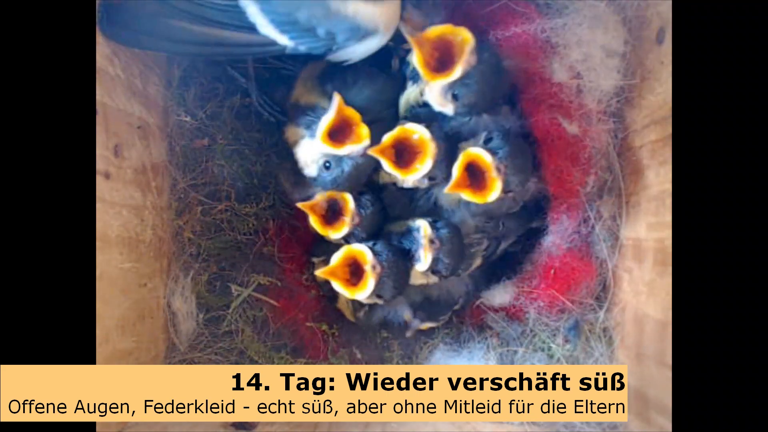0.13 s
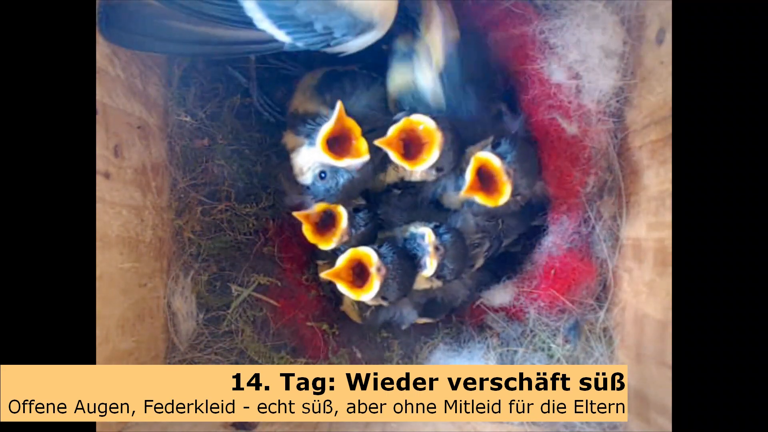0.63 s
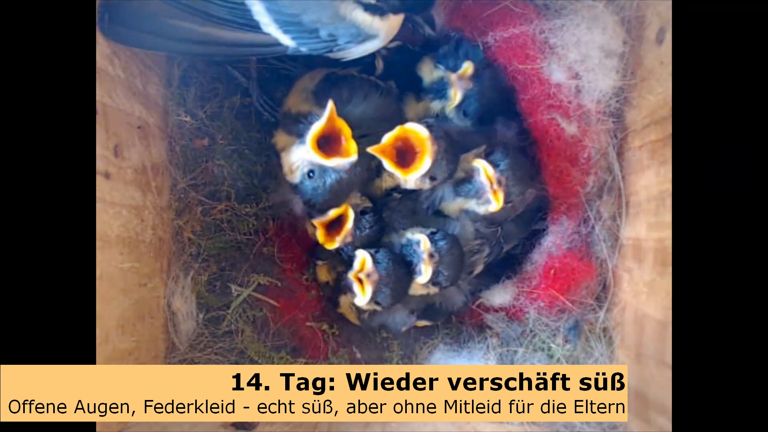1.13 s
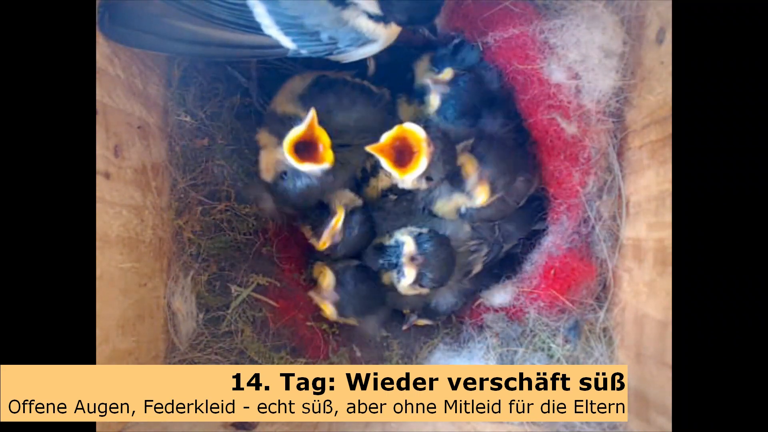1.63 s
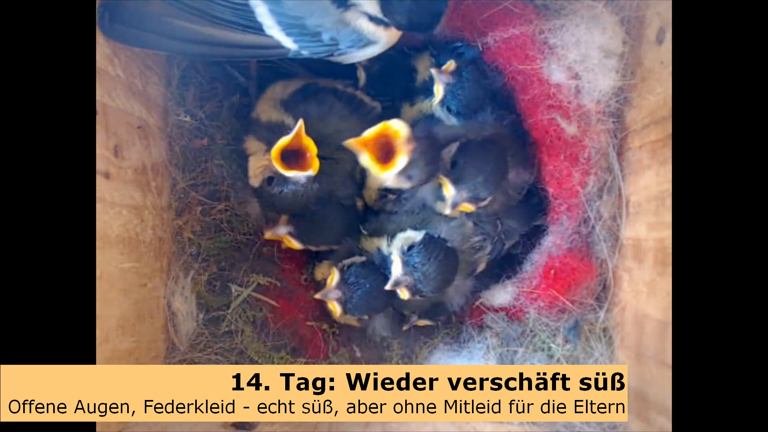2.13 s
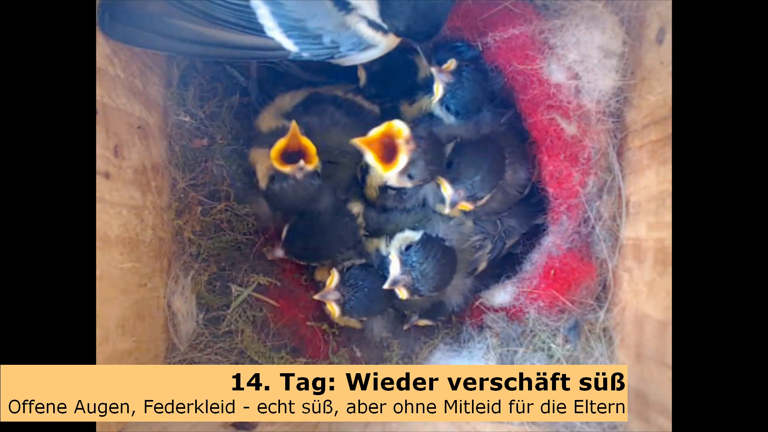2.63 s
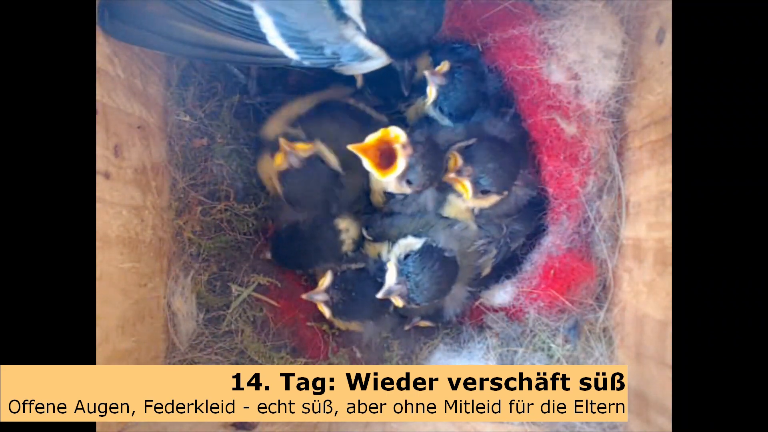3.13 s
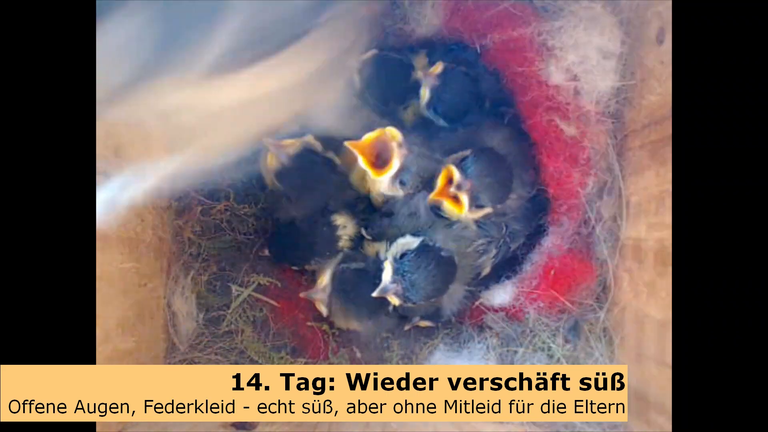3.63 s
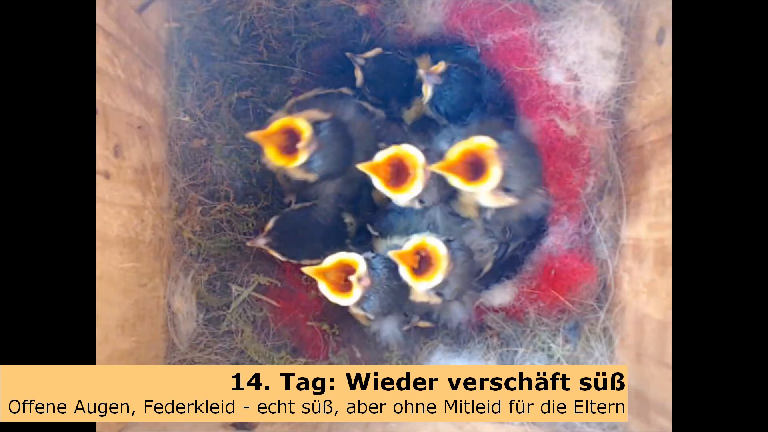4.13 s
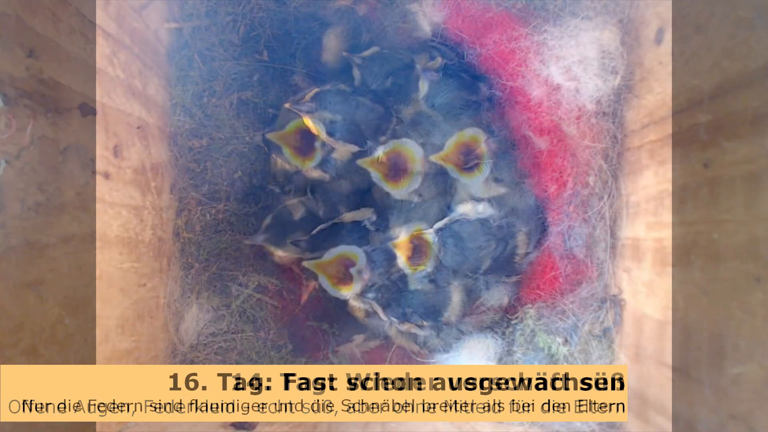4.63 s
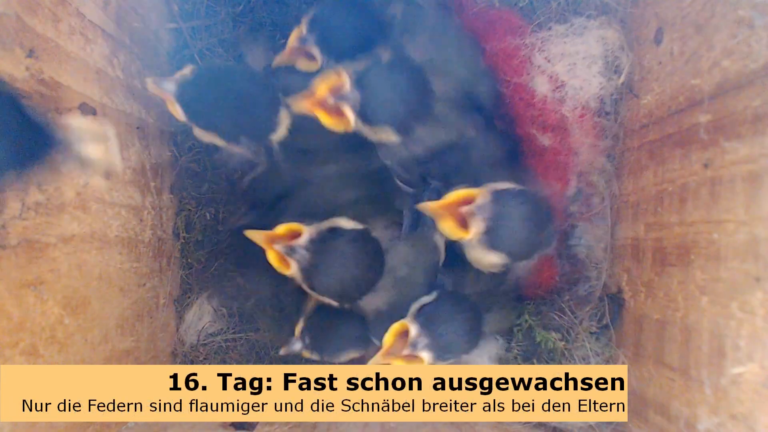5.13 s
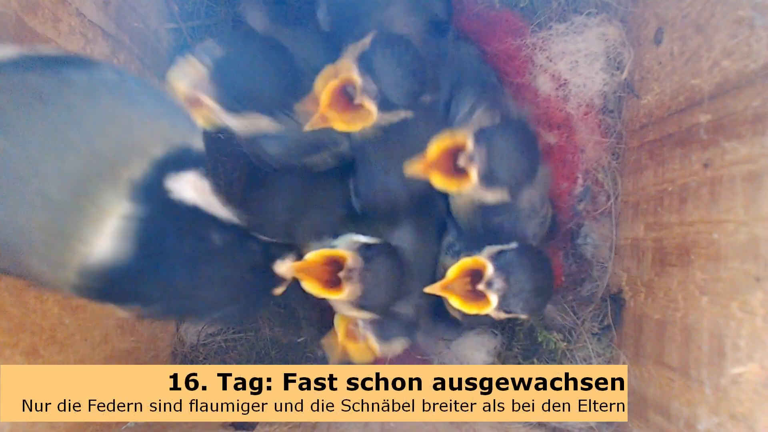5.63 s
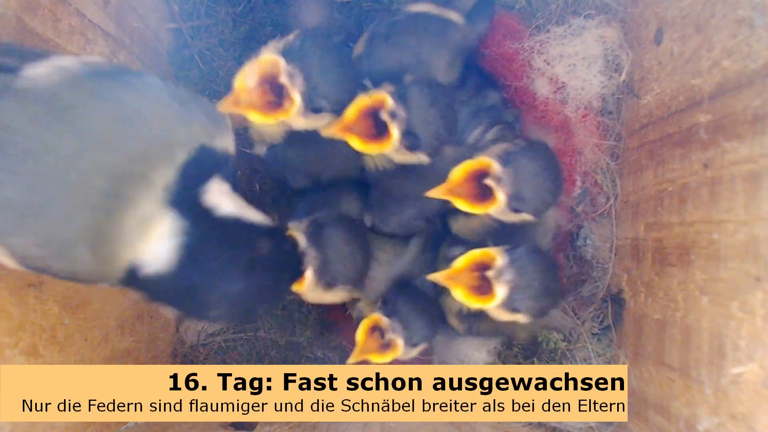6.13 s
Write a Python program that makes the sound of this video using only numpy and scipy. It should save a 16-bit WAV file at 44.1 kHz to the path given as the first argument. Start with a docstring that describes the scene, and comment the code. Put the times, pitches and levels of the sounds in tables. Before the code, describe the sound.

A brood of nestlings begs inside a small wooden nest box, heard very close in stereo with a faint low hush behind. From 0 to about 3.1 s, hoarse shrill calls, each a little over a tenth of a second, come in dense pulses four or five a second, mixed with raspy breath, rough lower cheeps and sharp bursts of crackle. Thin two-toned peeps slip between them. Around 3.2-3.6 s the calling weakens and briefly gaps; the parent's feet and feathers scuff the wood. From 3.7 s the calls surge back, more trembling and overlapping, with a knock near 3.9 s and soft low wing puffs at 4.0-4.15 s. Quick chirps glide upward around 4.5-4.8 s. From 4.9 s to the end at about 6.3 s, begging continues ragged and somewhat softer, with lower cheeps, lighter crackle, shuffling and hollow wooden knocks, strongest near 5.3 and 5.9 s.

```python
"""Nestlings beg hoarsely in a small wooden nest box, close to a pair of microphones, over a faint low hush.
From the start: overlapping high calls of trembling tones and breath, bursts of noise crackle apart in each
channel, and low cheeps as swept sines in throat noise. Thin two-voiced peeps show in the first three seconds.
From about 3.5 s the high voices tremble more, and the parent's scuffs and knocks ring the box walls as
resonators. Just after 4 s wing beats puff air on the microphones; quick rising chirps follow around 4.6 s."""
import sys
import numpy as np
from scipy import signal
from scipy.fft import rfft, irfft, next_fast_len
from scipy.io import wavfile
from scipy.ndimage import uniform_filter1d

SR = 44100
rng = np.random.default_rng(int(sys.argv[2]) if len(sys.argv) > 2 else 0)


def amplitude_ratio(level_db):
    """Convert a level in decibels to the matching linear amplitude (field) ratio."""
    exponent = np.asarray(level_db, float) / 20
    return 10 ** exponent


def transcribe(signal):
    """Save signal, clipped to [-1, 1], as a 16-bit WAV file at the path in sys.argv[1]."""
    frames = np.atleast_2d(signal).T
    limited = np.clip(frames, -1, 1)
    pcm = np.round(limited * 32767).astype(np.int16)
    wavfile.write(sys.argv[1], SR, pcm)


N = 276066


def rms_one(x):
    """Scale to rms 1."""
    return x / np.sqrt(np.mean(x ** 2) + 1e-20)


def in_time(rows):
    """Columns of a curve at every sample."""
    time_s, *columns = np.transpose(rows)
    return [np.interp(np.arange(N) / SR, time_s, column) for column in columns]


def drift(rate_hz, channels=1):
    """Slow chance: noise through a double one-pole low-pass, spread 1."""
    r = np.exp(-2 * np.pi * rate_hz / SR)
    noise = rng.standard_normal((channels, N + SR))
    settled = signal.lfilter([1], [1, -2 * r, r * r], noise)[:, SR:]
    return rms_one(settled)


def coloured(spectrum, source=None):
    """Unrelated noise in each channel, or a given source, shaped by a spectrum; rms 1."""
    hz, level_db = np.transpose(spectrum)
    size = next_fast_len(N)
    bins_hz = np.arange(size // 2 + 1) * SR / size
    shape = amplitude_ratio(np.interp(np.log(bins_hz + 1), np.log(hz), level_db))
    source = rng.standard_normal((2, N)) if source is None else source
    return rms_one(irfft(rfft(source, size) * shape, size)[:, :N])


def pan(left_over_right_db):
    """Left and right gains, half the difference each way."""
    return amplitude_ratio(np.array([[left_over_right_db / 2], [-left_over_right_db / 2]]))


def sine(hz):
    """A sine of peak 1 that follows a pitch curve, by summing its phase."""
    return np.sin(2 * np.pi * np.cumsum(hz, axis=-1) / SR)


# Spectrum of the hush: (frequency [Hz], relative density [dB per Hz])
HUSH_COLOUR = [(30, 7.5), (150, 2.5), (500, -7.5), (1600, -14.5), (1900, -33), (15000, -68.5)]
HUSH_DB = -59   # before panning


def hush():
    """A faint low bed of steady noise, apart in each channel."""
    return amplitude_ratio(HUSH_DB) * pan(7.5) * coloured(HUSH_COLOUR)


def wall_poles(hz, width_hz):
    """Denominator of a two-pole resonator: one ringing mode of the box walls."""
    r = np.exp(-np.pi * width_hz / SR)
    return [1, -2 * r * np.cos(2 * np.pi * hz / SR), r * r]


# Wall resonances: (frequency [Hz], width [Hz], relative level [dB])
BOX_MODES = [(307.4, 21, -3), (500.3, 24.3, 4), (778, 21, -6.5), (1376, 70, -8)]
# Spectrum of crackle and feather rustle: (frequency [Hz], relative density [dB per Hz])
CRACKLE_COLOUR = [(30, -5.5), (1200, -4), (3000, -6), (6000, -9), (14000, -16.5)]
# Loudness curve of the parent's shuffling, before panning: (time [s], level [dB])
SHUFFLE_CURVE = [(.64, -69.5), (.7, -56), (.77, -69), (3.42, -71.5), (3.5, -48.5), (3.72, -41.5),
                 (4.2, -55), (4.35, -89.5), (4.75, -55.5), (5.3, -44), (5.5, -72.5), (6.26, -54.5)]


def shuffling():
    """Feet and feathers scuff: scattered soft taps make the box walls boom, under a thin rustle."""
    taps_per_s = 1200
    taps = rng.standard_normal(N) * (rng.random(N) < taps_per_s / SR) * amplitude_ratio(4 * drift(15)[0])
    taps = signal.lfilter([.1], [1, -.9], taps)   # soft contacts
    boom = 0
    for hz, width_hz, db in BOX_MODES:
        ring = signal.lfilter([1, 0, -1], wall_poles(hz, width_hz), taps + 1e-18)
        boom = boom + amplitude_ratio(db) * rms_one(ring)
    rustle = amplitude_ratio(-15) * coloured(CRACKLE_COLOUR) * amplitude_ratio(4.3 * drift(60))   # feathers
    return amplitude_ratio(in_time(SHUFFLE_CURVE)[0]) * (rms_one(boom) + rustle) * pan(4.9)


# Knocks on the walls: (time [s], relative strength [dB])
KNOCKS = [(3.542, -43), (3.923, -32.5), (4.738, -32), (4.87, -36.5), (5.052, -38), (5.138, -31),
          (5.237, -37.5), (5.296, -38), (5.341, -28.5), (5.862, -26.5)]


def knocks():
    """Single clicks ring the wall resonances, each mode struck with a slightly different strength."""
    times_s, knock_db = np.transpose(KNOCKS)
    out = 0
    for hz, width_hz, db in BOX_MODES:
        strength_db = 2.0 * rng.standard_normal(len(KNOCKS))
        clicks = np.full(N, 1e-18)
        clicks[(times_s * SR).astype(int)] = amplitude_ratio(knock_db + db + strength_db)
        out = out + signal.lfilter([.5, 0, -.5], wall_poles(hz, width_hz), clicks)
    return uniform_filter1d(out, size=40) * pan(4.9)   # blunted contact


# Wing puffs: (time [s], size before panning [signed amplitude; positive swings up first])
PUFFS = [(3.991, 0.06), (4.041, 0.086), (4.074, -0.053), (4.142, 0.036), (4.642, 0.02)]
PUFF_S = 0.0021   # from the middle of a puff to its peak


def wing_puffs():
    """Each wing beat is one slow push and pull of air, with ragged rumble around it."""
    out, rumble = np.zeros((2, N)), drift(49, channels=2)
    for time_s, size in PUFFS:
        x = (np.arange(N) / SR - time_s) / PUFF_S
        push_pull = x * np.exp((1 - x ** 2) / 2)
        swirl = 0.68 * rumble * np.exp(-np.abs(x) / 30)   # stirred air
        out -= size * (push_pull + swirl) * pan(4.6)
    return out


# Bursts of crackle: (start [s], length [s], relative left level [dB])
CRACKLE_BURSTS = [(0.097, 0.051, -26), (0.274, 0.058, -22), (0.431, 0.058, -23.5), (0.541, 0.0098, -35.5),
                  (0.594, 0.045, -23.5), (0.815, 0.072, -22), (1.038, 0.069, -24), (1.29, 0.06, -25),
                  (1.455, 0.062, -21.5), (1.532, 0.012, -35.5), (1.638, 0.054, -22), (1.941, 0.041, -26.5),
                  (2.114, 0.062, -23.5), (2.342, 0.049, -26), (2.576, 0.035, -30), (2.801, 0.033, -27),
                  (3.002, 0.047, -25.5), (3.715, 0.085, -40), (3.872, .17, -33.5), (4.074, 0.069, -27),
                  (4.262, 0.092, -31.5), (4.518, 0.054, -30.5), (4.705, 0.033, -34.5), (4.83, .041, -40),
                  (4.921, 0.062, -38), (5.067, 0.088, -34.5), (5.215, 0.064, -30), (5.315, 0.16, -34.5),
                  (5.407, 0.056, -32.5), (5.514, 0.084, -33.5), (5.681, 0.072, -30.5),
                  (5.836, 0.075, -29.5), (5.994, 0.058, -32), (6.076, 0.038, -38), (6.129, 0.072, -32.5),
                  (6.236, 0.028, -35.5)]
RIGHT_CRACKLE_DB = -4.0   # right against left, on average


def crackle():
    """Broad spits a few ms long: the louder the burst, the denser they come, until they merge into a roar."""
    level_db, t = np.full((2, N), -120.), np.arange(N) / SR
    right_db = RIGHT_CRACKLE_DB + 3.7 * drift(3.0)[0]
    for start, length, left_db in CRACKLE_BURSTS:
        near = slice(max(round((start - .06) * SR), 0), round((start + length + .06) * SR))
        outside = (t[near] - start - length / 2) / (length / 2)
        outside = np.where(outside > 0, outside ** 1.15, -outside)   # holds, then stops short
        burst_db = left_db - 9 * outside ** 2.47 + right_db[near] * [[0], [1]]
        level_db[:, near] = np.maximum(level_db[:, near], burst_db)
    # a few sharp spikes among many small
    spikes = rng.standard_normal((2, N)) * amplitude_ratio(3.83 * rng.exponential(1, (2, N)).clip(0, 3.5))
    threshold = np.clip((-36.0 - level_db) / 9, -1.2, 1.2)
    gate = 1 / (1 + np.exp(-4.0 * (drift(196, channels=2) - threshold)))
    gate = gate / np.sqrt(uniform_filter1d(gate ** 2, size=2000) + 0.28)   # the spits share out the level
    return amplitude_ratio(level_db + 10) * gate * coloured(CRACKLE_COLOUR, spikes)


# Quick rising chirps: (start [s], length [s], first pitch [Hz], peak level before flutter [dB])
CHIRPS = [(4.47, 0.11, 6700, -46.5), (4.653, 0.0254, 5100, -35.5), (4.686, 0.064, 3430, -35),
          (4.752, 0.039, 5100, -39.5)]
RISE_HZ_PER_S = 11000


def chirps():
    """Short fluttering notes that glide straight up."""
    out, flutter = np.zeros(N), 1 + .6 * drift(200, channels=2)
    for start, length, first_hz, db in CHIRPS:
        part = np.linspace(0, 1, round(length * SR))
        at = round(start * SR)
        note = sine(first_hz + RISE_HZ_PER_S * length * part)
        out[at:at + len(part)] += amplitude_ratio(db) * note * np.abs(np.sin(np.pi * part)) ** .6
    return out * flutter


# Noise around a cheep: (frequency [Hz], relative density [dB per Hz])
THROAT_COLOUR = [(1800, -14.5), (2700, -11), (4400, 0.5), (5600, -18)]
# Low cheeps: (start [s], length [s], pitch [Hz], level before flutter and panning [dB])
CHEEPS = [(0.04, 0.062, 2960, -43.5), (0.069, 0.09, 3820, -31), (0.539, 0.066, 3200, -38.5),
          (0.786, 0.087, 3785, -31.5), (1.008, 0.073, 3890, -36), (1.269, 0.089, 3830, -35),
          (1.501, 0.057, 3830, -36.5), (1.667, 0.046, 3830, -31.5), (1.71, 0.081, 3440, -40.5),
          (1.915, .09, 3800, -34), (2.105, .09, 3750, -33.5), (2.329, 0.074, 3820, -31),
          (2.548, 0.084, 3720, -33), (2.766, .098, 3710, -34.5), (2.975, .1, 3790, -33.5),
          (3.177, 0.072, 4056, -38), (3.252, .065, 3830, -37), (3.345, 0.081, 3990, -34),
          (3.64, 0.052, 3860, -39), (3.73, 0.047, 3900, -33.5), (3.842, 0.12, 3856, -35),
          (3.946, 0.088, 3820, -33.5), (4.089, 0.054, 3890, -30.5), (4.249, 0.081, 3820, -36.5),
          (4.322, 0.052, 3870, -40), (5.312, 0.06, 2830, -38.5), (5.488, 0.12, 2896, -38),
          (5.62, 0.062, 3740, -39.5), (5.66, 0.076, 2860, -37.5), (5.814, 0.094, 2846, -38.5),
          (5.976, 0.079, 2850, -35.5), (6.104, 0.11, 2793, -36.5)]


def cheeps():
    """Rough low notes whose pitch sags and then climbs, each in a halo of throat noise, with a weak octave."""
    out = np.zeros((2, N))
    wobble = drift(45)[0] + 1.2 * drift(400)[0]
    flutter = (1 + .5 * drift(200, channels=2)) * amplitude_ratio(4.0 * drift(30))
    halo = amplitude_ratio(-4.5) * coloured(THROAT_COLOUR)
    for start, length, hz, db in CHEEPS:
        part = np.linspace(0, 1, round(length * SR))
        span = slice(round(start * SR), round(start * SR) + len(part))
        pitch_hz = hz * (1 + 0.12 * (part - .4) ** 2 - .012 + 0.011 * wobble[span])
        octave = amplitude_ratio(-13.5) * sine(2 * pitch_hz)
        tone = np.sqrt(2) * (sine(pitch_hz) + octave) * flutter[:, span]
        swell = np.abs(np.sin(np.pi * part)) ** 0.51
        out[:, span] += amplitude_ratio(db) * (tone + halo[:, span]) * swell
    return out * pan(7.2)


SIDEBAND_HZ, SIDEBAND_DB = 3900, -17   # copies above and below the high tones; level in the peeps


def whistle(hz):
    """A sine of rms 1 with faint sidebands, made by a fast beat in strength."""
    beat = 1 + 2 * amplitude_ratio(SIDEBAND_DB) * np.cos(2 * np.pi * SIDEBAND_HZ * np.arange(hz.shape[-1]) / SR)
    return np.sqrt(2) * sine(hz) * beat


# Breath rasp in peeps and calls: (frequency [Hz], relative density [dB per Hz])
RASP_COLOUR = [(1500, -3.5), (2600, -12), (4800, -10), (6500, 0.5), (7500, 1.5), (8300, -16.5), (15500, -6)]
# Clear peeps: (start [s], length [s], first pitch [Hz], last pitch [Hz], first-voice level before panning [dB])
PEEPS = [(0.503, 0.11, 7350, 6800, -43), (0.907, 0.1, 5930, 6330, -46.5), (1.106, 0.089, 6470, 5720, -42),
         (1.378, 0.04, 6240, 5960, -44.5), (1.787, 0.053, 6570, 5890, -45),
         (2.004, 0.073, 6170, 5550, -62.5), (2.192, 0.11, 6260, 6480, -48.5),
         (2.629, .12, 6660, 5340, -42.5), (3.053, 0.064, 6640, 5450, -45)]
TWIN_HZ, TWIN_DB = 442, -4.5   # second side of the syrinx, above the first


def peeps():
    """Two-voiced whistles that bow and tremble in pitch and bend late, with a little breath."""
    out, breath = np.zeros(N), amplitude_ratio(-13) * coloured(RASP_COLOUR)[0]
    for start, length, first_hz, last_hz, db in PEEPS:
        part = np.linspace(0, 1, round(length * SR))
        bend_hz = (last_hz - first_hz) * part ** 2.2
        tremble_hz = 50 * np.sin(2 * np.pi * 30 * length * part)   # 30 times a second
        hz = first_hz + bend_hz + 90 * np.sin(np.pi * part) + tremble_hz
        tone = whistle(hz) + amplitude_ratio(TWIN_DB) * whistle(hz + TWIN_HZ)
        span = slice(round(start * SR), round(start * SR) + len(part))
        out[span] += amplitude_ratio(db) * (tone + breath[span]) * np.abs(np.sin(np.pi * part)) ** 0.4
    return out * pan(11)


# Hoarse high calls, often overlapping: (start [s], length [s], relative level [dB])
CALLS = [(-0.055, 0.1, -31.0), (0.033, 0.13, -30), (0.24, 0.16, -28.5), (0.398, 0.11, -27),
         (0.485, 0.11, -30.5), (0.556, 0.097, -28.0), (0.762, 0.16, -31), (0.885, 0.082, -42.5),
         (0.994, 0.16, -31), (1.089, 0.11, -32.5), (1.251, 0.14, -30.0), (1.34, 0.066, -37.0),
         (1.418, 0.11, -32), (1.508, 0.091, -32.5), (1.604, 0.11, -29), (1.694, 0.1, -34.5),
         (1.881, 0.13, -31.5), (2.08, 0.13, -29.5), (2.298, 0.13, -31), (2.39, 0.043, -35.5),
         (2.536, 0.11, -30), (2.629, 0.11, -42.5), (2.755, 0.1, -30.5), (2.837, 0.063, -41.0),
         (2.976, 0.13, -32.5), (3.049, 0.054, -38), (3.159, 0.097, -37), (3.229, 0.11, -43),
         (3.309, 0.12, -34), (3.602, 0.105, -41.5), (3.668, 0.15, -30.5), (3.828, 0.13, -33.5),
         (3.902, 0.16, -28.0), (4.034, 0.13, -28), (4.204, 0.18, -30.0), (4.357, 0.06, -42),
         (4.467, 0.1, -33.5), (4.529, 0.11, -32), (4.635, 0.075, -37), (4.672, 0.079, -38.5),
         (4.729, 0.091, -39), (4.79, 0.11, -41), (4.884, 0.13, -31.5), (4.983, 0.087, -37.5),
         (5.038, 0.12, -33.5), (5.189, 0.15, -33), (5.286, 0.2, -34.5), (5.464, 0.18, -35.0),
         (5.594, 0.11, -36), (5.664, 0.11, -33), (5.792, 0.16, -37.5), (5.945, 0.15, -36.5),
         (6.038, 0.15, -33), (6.152, 0.151, -34)]
ATTACK_S, RELEASE_S, EDGE_POWER = .05, .035, 1.19   # every call swells and stops alike


def effort():
    """Level in dB of all calls together, summed as power, each with the same swell and stop."""
    start, length, db = np.transpose(CALLS)[:, :, None]
    t = np.arange(0, N + 32, 32) / SR
    swell = np.sin(np.pi / 2 * np.clip((t - start) / ATTACK_S, 0, 1))
    stop = np.sin(np.pi / 2 * np.clip((start + length - t) / RELEASE_S, 0, 1))
    power = np.sum((amplitude_ratio(db) * (swell * stop) ** EDGE_POWER) ** 2, axis=0)
    return np.interp(np.arange(N) / SR, t, 10 * np.log10(power + 1e-9))


def hoarse(hz, wander, jitter, rough, come_go_db):
    """A voice of wandering, trembling pitch; its strength flutters separately in each channel."""
    pitch_hz = hz * (1 + wander * drift(9.1) + jitter * drift(305.4))
    strength = (1 + rough * drift(220, channels=2)) * amplitude_ratio(come_go_db * drift(14, channels=2))
    return sine(pitch_hz) * strength


# Lead voices: (pitch [Hz], relative level [dB], left over right [dB])
HIGH_VOICES = [(7140, 3, 7), (6780, -4, -19), (6270, -9.5, -17.5)]
# Pitch tremble of the lead voices: (time [s], spread [share of pitch])
HOARSENESS = [(3.5, .004), (3.9, .014)]
SAG_PER_DB = .001   # share of pitch lost per dB of lost effort


def brood():
    """Hoarse high voices sag as effort fades; the other nestlings add broken strands of pitch and rasp."""
    effort_db = effort()
    sag = 1 + SAG_PER_DB * np.clip(effort_db + 32, -30, 5)
    tremble, = in_time(HOARSENESS)
    high = 0
    for hz, db, side_db in HIGH_VOICES:
        high = high + amplitude_ratio(db) * pan(side_db) * hoarse(hz * sag, .011, tremble, .4, 4.5)
    high = rms_one(high)
    sidebands = high * np.cos(2 * np.pi * SIDEBAND_HZ * np.arange(N) / SR)
    strands = sum(hoarse(hz, .045, .015, .6, 5) for hz in np.geomspace(2700, 11500, 14))
    rasp = coloured(RASP_COLOUR) * amplitude_ratio(2.5 * drift(60, channels=2))
    crowd = coloured(RASP_COLOUR, strands) + amplitude_ratio(-5) * rasp
    middle = signal.butter(2, [2400, 8300], "band", fs=SR, output="sos")
    edges = crowd - signal.sosfilt(middle, crowd)
    crowd = crowd - edges * np.clip((-29 - effort_db) / 9, 0, 1)   # soft calls are thin: no rasp below and above
    return amplitude_ratio(effort_db) * (amplitude_ratio(-3.0) * (high + amplitude_ratio(-6.5) * sidebands) + amplitude_ratio(-0.5) * crowd)


def scene():
    """All sources, from the hush up to the calling brood."""
    parent = shuffling() + knocks() + wing_puffs()
    return hush() + parent + crackle() + chirps() + cheeps() + peeps() + brood()


def band_limit(x):
    """A steep low-pass at the top of the band."""
    return signal.sosfilt(signal.butter(12, 16130, fs=SR, output="sos"), x)


def record(dry):
    """Peaks are rounded off softly, never beyond half of full scale."""
    rounded = .5 * np.tanh(dry / .5)
    return band_limit(rounded)


dry = scene()
out = record(dry)
transcribe(out)
```